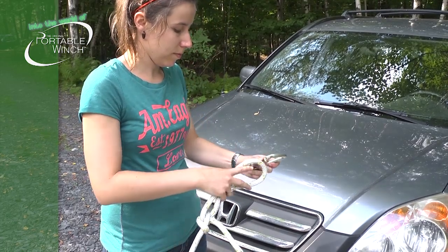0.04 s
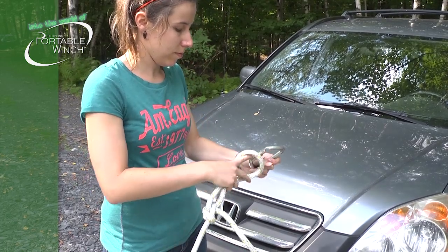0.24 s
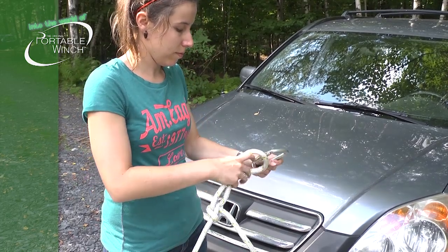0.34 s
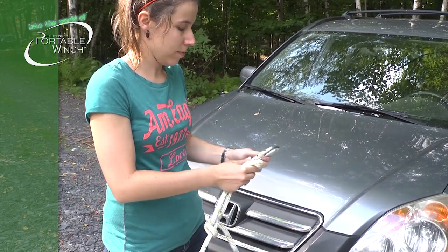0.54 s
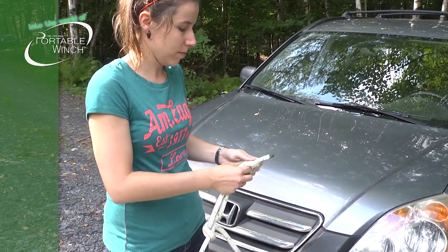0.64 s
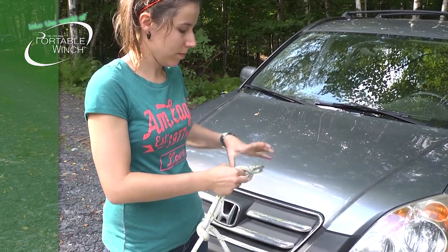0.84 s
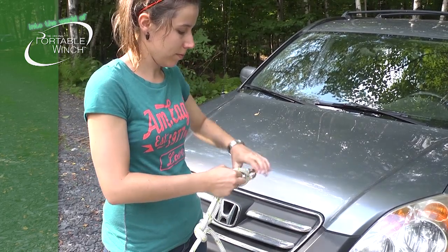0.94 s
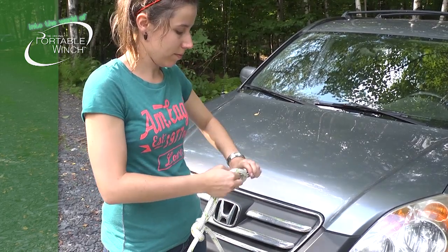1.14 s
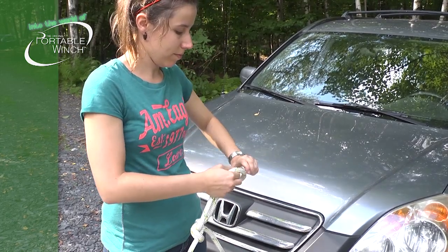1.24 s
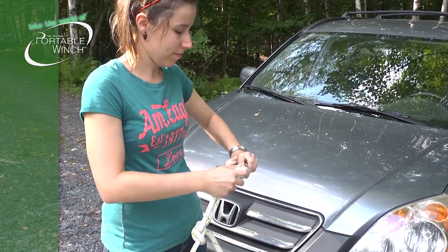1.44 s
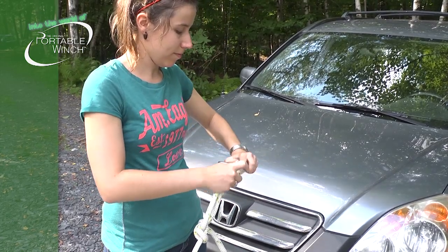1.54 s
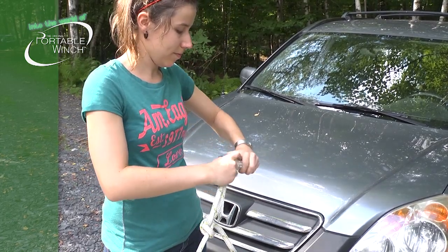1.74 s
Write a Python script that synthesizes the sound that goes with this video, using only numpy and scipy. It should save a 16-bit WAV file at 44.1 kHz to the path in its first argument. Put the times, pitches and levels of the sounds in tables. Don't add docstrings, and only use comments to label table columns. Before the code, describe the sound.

Metal snap link handled at a forest edge: quiet rumble and faint machine hum, a soft hand thud and brush, then one hard, clipped click with a short airy echo, followed by barely audible rubbing. Close microphone, nearly mono.

```python
import sys
import numpy as np
from scipy import signal
from scipy.fft import rfft, irfft
from scipy.io import wavfile
from scipy.ndimage import uniform_filter1d

SR = 44100
rng = np.random.default_rng(int(sys.argv[2]) if len(sys.argv) > 2 else 0)


def volts_from_decibels(level):
    exponent = np.asarray(level, float) / 20
    return 10 ** exponent


def dump_mix(stems):
    frames = np.atleast_2d(stems).T
    limited = np.clip(frames, -1, 1)
    pcm = np.round(limited * 32767).astype(np.int16)
    wavfile.write(sys.argv[1], SR, pcm)


N = 79380


def rms_one(x):
    return x / np.sqrt(np.mean(x ** 2) + 1e-20)


def noise():
    return rng.standard_normal(N)


def band(x, low_hz, high_hz, order=2):
    return signal.sosfilt(signal.butter(order, [low_hz, high_hz], "band", fs=SR, output="sos"), x)


def drift(rate_hz):
    r = np.exp(-2 * np.pi * rate_hz / SR)
    wander = signal.lfilter([1], [1, -2 * r, r * r], rng.standard_normal(N + SR))
    return rms_one(wander[SR:])


def ring(x, hz, t60):
    r, w = volts_from_decibels(-60 / (t60 * SR)), 2 * np.pi * hz / SR
    return signal.lfilter([0, np.sin(w)], [1, -2 * r * np.cos(w), r * r], x + 1e-18)


def bump(centre_s, length_s):
    t = np.arange(N) / SR
    return np.exp(-.5 * ((t - centre_s) / (length_s / 4)) ** 2)


# [f/Hz, level/dB per Hz]
AIR_COLOUR = [(22, 4.5), (35, -3), (90, -15.5), (220, -32.5), (600, -38.5), (1200, -44.5), (3000, -50),
              (15000, -54.5)]


def air():
    air_db = -37.5
    corner_hz, corner_db = np.transpose(AIR_COLOUR)
    hz = np.maximum(np.fft.rfftfreq(N, 1 / SR), 1)
    shape = volts_from_decibels(np.interp(np.log(hz), np.log(corner_hz), corner_db))
    shape = shape * np.minimum(hz / corner_hz[0], 1) ** 2
    return volts_from_decibels(air_db) * rms_one(irfft(rfft(noise()) * shape, N))


def side_hiss():
    return volts_from_decibels(-68) * rms_one(band(noise(), 170, 19000))


def insects():
    return volts_from_decibels(-73 + drift(8.8)) * rms_one(band(noise(), 4850, 5780, order=5))


# [t/s, roar level/dB, hum level/dB]
MACHINE_EFFORT = [(0, -57.5, -65), (.1, -60, -69), (.2, -60.5, -76), (.52, -70, -72), (.56, -58.5, -67),
                  (.7, -58, -60), (.745, -61, -53.5), (.83, -57.5, -61), (.88, -64.5, -53.5),
                  (1.059, -52, -58), (1.121, -61.5, -62), (1.17, -57.5, -51), (1.22, -57.5, -65.5),
                  (1.31, -60, -52.5), (1.49, -61, -62), (1.54, -56.5, -55), (1.8, -59, -52)]
# [f/Hz, level/dB, pitch wander/Hz]
HUM_TONES = [(270, -10, 2), (310, -14, 5), (329.5, 0, 1.5), (390, -19, 2), (449.5, -18, 2), (540, -23, 2),
             (810, -18, 3), (1424, -26, 2)]


def machine():
    roar_low_hz, roar_high_hz, roar_even_s, roar_patchy_db = 810, 985, .07, 1
    hum_waver_db = 1.2
    t = np.arange(N) / SR
    s, roar_db, hum_db = np.transpose(MACHINE_EFFORT)

    roar = band(noise(), roar_low_hz, 2000, order=3)
    roar = rms_one(band(roar, 330, roar_high_hz, order=10))
    recent_power = uniform_filter1d(roar ** 2, size=int(roar_even_s * SR))
    roar = roar / np.sqrt(recent_power + 1e-3)
    roar_level = volts_from_decibels(np.interp(t, s, roar_db) + roar_patchy_db * drift(22))

    hum = np.zeros(N)
    for hz, db, wander_hz in HUM_TONES:
        phase = 2 * np.pi * np.cumsum(hz + wander_hz * drift(21)) / SR
        tone = 2 ** .5 * np.sin(phase)
        hum += volts_from_decibels(db) * tone * volts_from_decibels(hum_waver_db * drift(12))
    return roar_level * roar + volts_from_decibels(np.interp(t, s, hum_db)) * hum


# [t/s, level/dB, length/s, centre f/Hz]
HAND_BRUSHES = [
    (0.198, -53.5, 0.036, 3700),
    (0.472, -62, 0.035, 1810),
    (0.67, -64, 0.046, 2420),
    (1.81, -62.5, 0.12, 2490),
]


def brushes():
    out = np.zeros(N)
    for s, db, length_s, hz in HAND_BRUSHES:
        rub = rms_one(band(noise(), hz / 1.7, hz * 1.7))
        out += volts_from_decibels(db) * bump(s, length_s) * rub
    return out


# [t/s, f/Hz, level/dB, length/s]
SOFT_KNOCKS = [
    (0.161, 66.24, -29, .12),
    (.2152, 747, -29, .005),
    (0.297, 883, -45, 0.026),
]


def knocks():
    t = np.arange(N) / SR
    out = np.zeros(N)
    for s, hz, db, length_s in SOFT_KNOCKS:
        out += volts_from_decibels(db) * bump(s, length_s) * np.sin(2 * np.pi * hz * (t - s))
    return out


# [low f/Hz, high f/Hz, level/dB, t60/s]
TREE_BANDS = [
    (3150, 3900, -27, .4),
    (3922, 4400, -19, 0.65),
    (4500, 7000, -19.5, 0.58),
    (7000, 11000, -24.5, 0.44),
    (11000, 15000, -24.5, .22),
]


def trees(x):
    rise_s = .015
    t = np.arange(SR) / SR
    echo = np.zeros(SR)
    for low_hz, high_hz, db, t60 in TREE_BANDS:
        tail = rng.standard_normal(SR) * volts_from_decibels(-60 * t / t60) * (1 - np.exp(-t / rise_s))
        tail = tail / np.sqrt(np.sum(tail ** 2))
        echo += volts_from_decibels(db) * band(tail, low_hz, high_hz)
    return signal.fftconvolve(x, echo)[:N]


# [delay t/s, full level/dB, main ring level/dB]
NEAR_BOUNCES = [
    (.0057, -20, -5.5),
    (.0116, -30, -26),
    (.0165, -36, -25),
]


def bounces(x):
    main_ring = band(x, 3900, 4700)
    out = np.zeros(N)
    for s, full_db, ring_db in NEAR_BOUNCES:
        lag = int(s * SR)
        bounce = volts_from_decibels(full_db) * x + volts_from_decibels(ring_db) * main_ring
        out[lag:] += bounce[:N - lag]
    return out


def push():
    push_s = 0.0011
    return volts_from_decibels(-25) * bump(GATE_CONTACTS[4][0] + push_s, push_s)


# [t/s, level/dB, upper limit f/Hz]
GATE_CONTACTS = [
    (.2091, -27, 11000),
    (.2098, -22, 11000),
    (.2103, -23, 11000),
    (.2127, -31, 5000),
    (.2139, -1, 14000),
    (.2146, -4, 14000),
    (.21555, -2, 14000),
    (.2166, -9, 12000),
    (.2176, -8, 9000),
    (.2191, -15, 12000),
]
# [f/Hz, level/dB, t60/s]
LINK_TONES = [(1600, -30, .012), (2060, -28, .016), (3060, -15, .011), (3380, -14, .01), (3640, -12, .010),
              (4250, -4, .008), (5345, -15, .011), (5700, -12, .008), (6500, -15, .009), (7810, -6, .011),
              (9375, -14, .013), (10350, -20, .013), (11600, -20, .009), (13400, -18, .009)]


def snap():
    snap_db, strike_spread_db = 3, 1.5
    crack_db, crack_t60_s = -14, .008
    body_low_hz = 2055
    t = np.arange(SR // 8) / SR
    click = (t == 0) * 1.
    out = np.zeros(N)
    for s, db, dull_hz in GATE_CONTACTS:
        hit = np.zeros(len(t))
        for hz, tone_db, t60 in LINK_TONES:
            strike_db = tone_db + strike_spread_db * rng.standard_normal()
            hit += volts_from_decibels(strike_db) * ring(click, hz, t60)
        crack = band(rng.standard_normal(len(t)), 2500, 15000)
        hit += volts_from_decibels(crack_db - 60 * t / crack_t60_s) * crack
        start = int(s * SR)
        out[start:start + len(t)] += volts_from_decibels(snap_db + db) * band(hit, body_low_hz, dull_hz)
    return out


def scene():
    link = snap()
    near = link + bounces(link)
    scattered = trees(link * bump(GATE_CONTACTS[5][0], .006))
    background = air() + machine() + insects()
    mid = background + brushes() + knocks() + scattered + push() + near
    side = side_hiss() + volts_from_decibels(-45) * near
    return np.array([mid + side, mid - side])


def roll_off(x):
    return signal.sosfilt(signal.butter(12, 15890, fs=SR, output="sos"), x)


def record(dry):
    mix = np.clip(dry, -1.0, 1.0)
    return roll_off(mix)


dry = scene()
out = record(dry)
dump_mix(out)
```